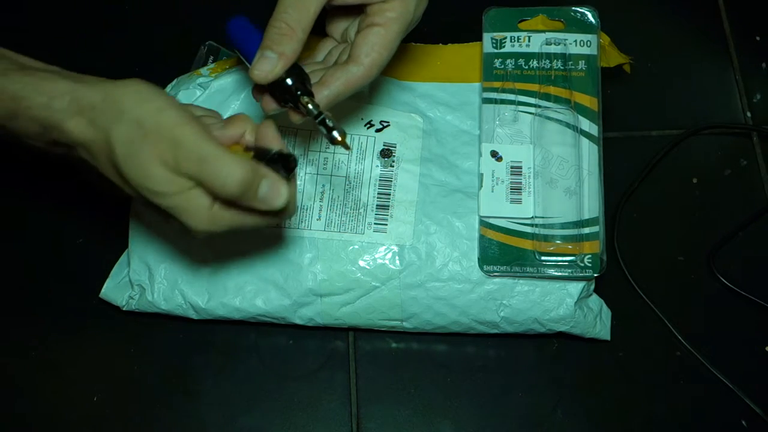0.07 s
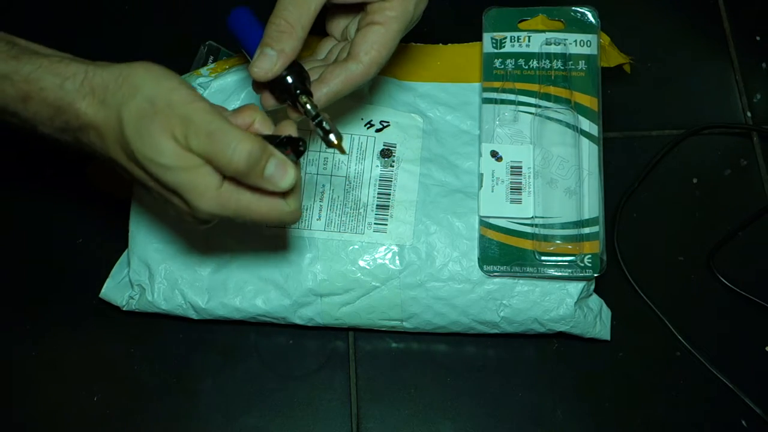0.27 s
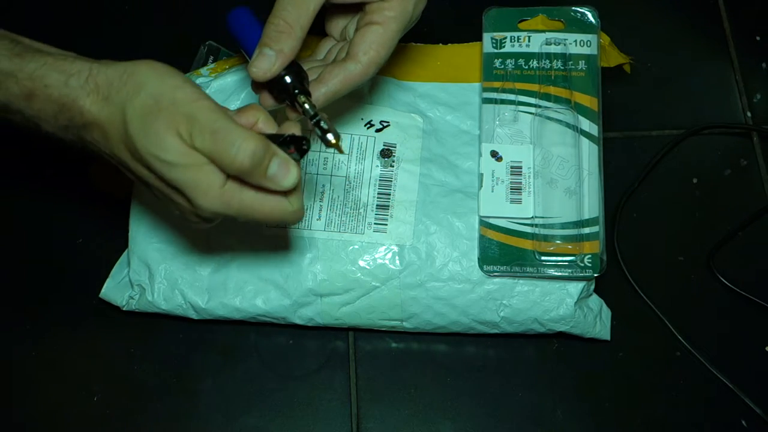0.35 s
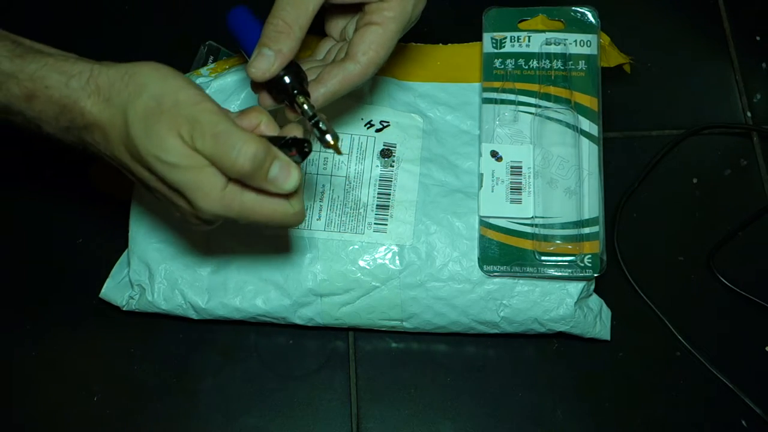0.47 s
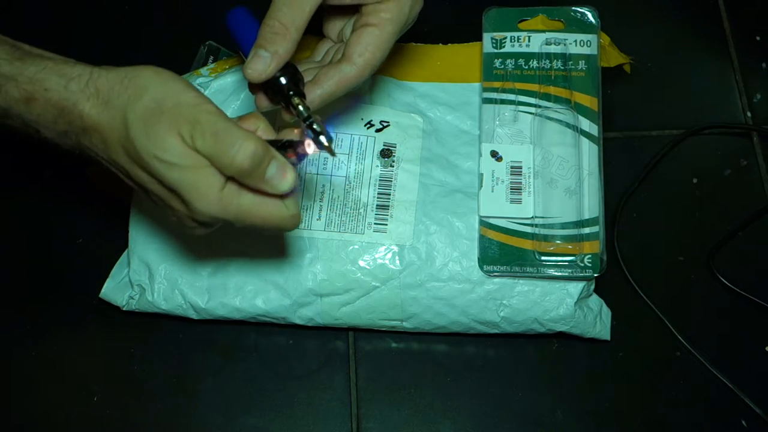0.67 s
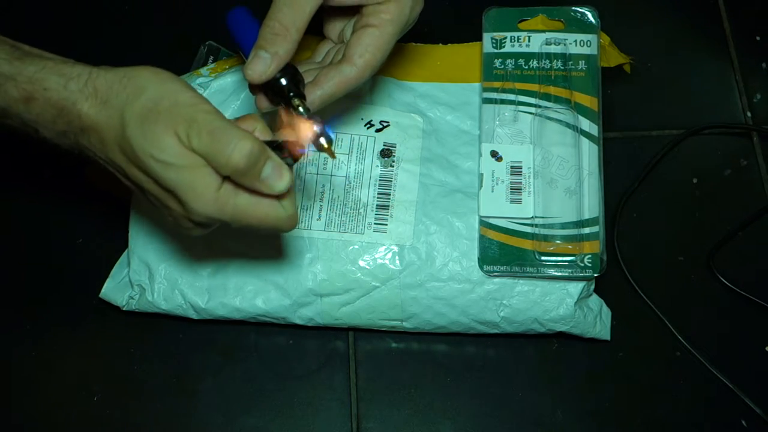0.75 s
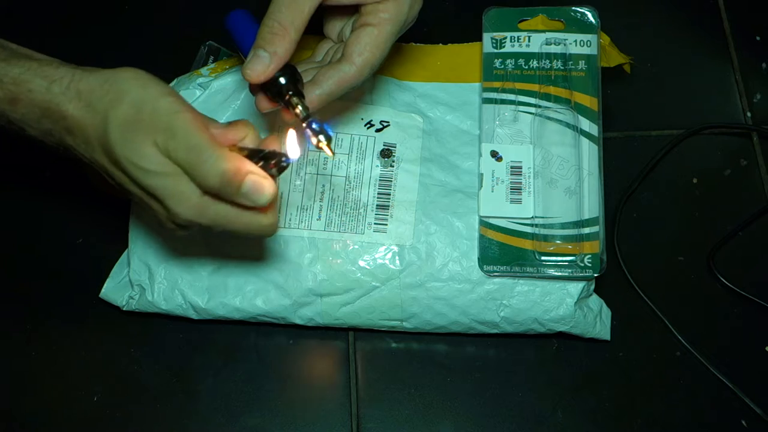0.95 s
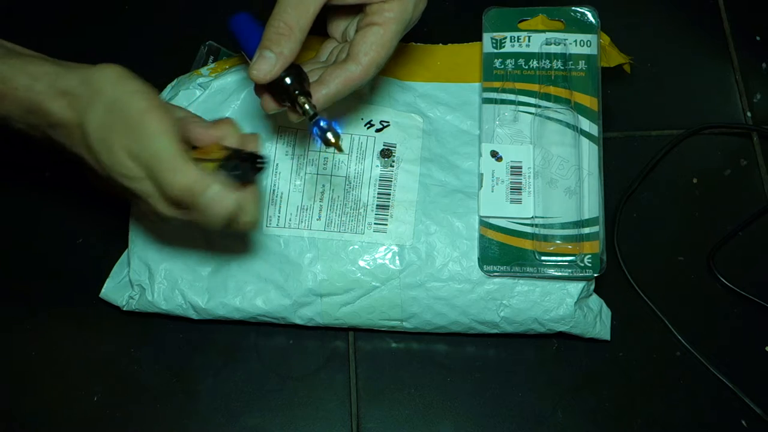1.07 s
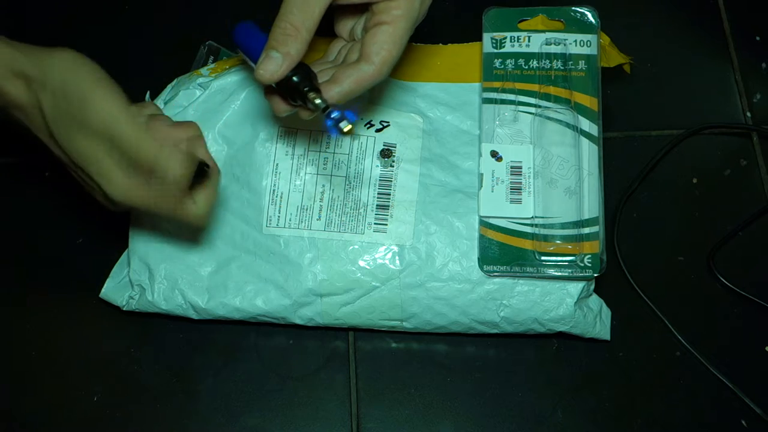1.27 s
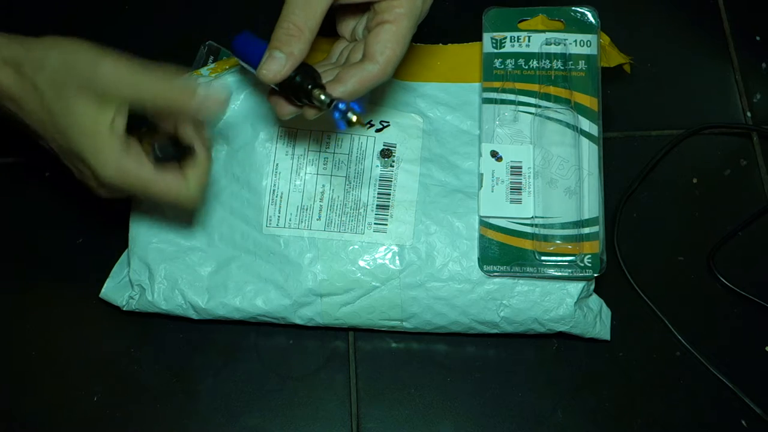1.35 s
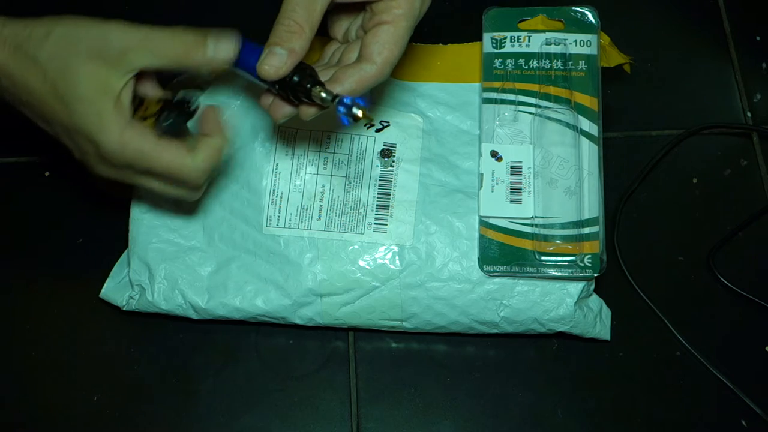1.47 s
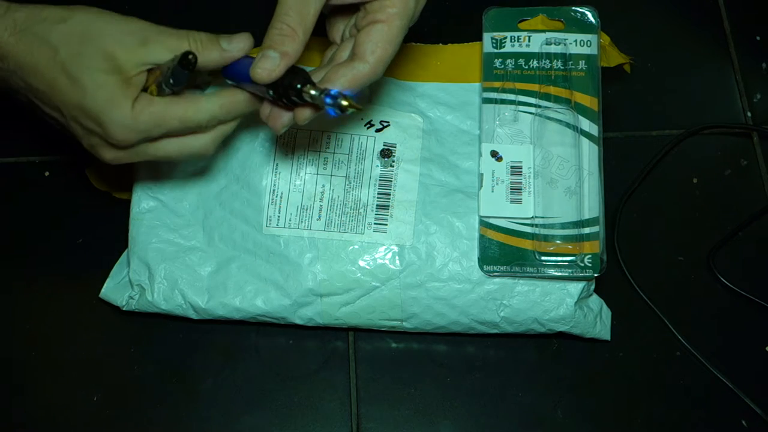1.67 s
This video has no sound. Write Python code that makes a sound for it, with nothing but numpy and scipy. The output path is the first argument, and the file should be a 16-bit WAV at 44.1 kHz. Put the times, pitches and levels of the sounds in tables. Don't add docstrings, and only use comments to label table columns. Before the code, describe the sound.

A flint lighter is worked close to the microphone in a small hard room, over faint steady gas hiss and low motor hum. Tiny steel ticks come at 0.12-0.23 s, a plastic knock at 0.37, ticks from 0.57, then a bright gritty flint rasp at 0.7 with a soft low puff. Lever clacks follow at 0.97 and 1.07, and a faint grip creak near 1.5.

```python
import sys
import numpy as np
from scipy import signal
from scipy.fft import rfft, irfft, next_fast_len
from scipy.io import wavfile
from scipy.ndimage import map_coordinates

SR = 44100
rng = np.random.default_rng(int(sys.argv[2]) if len(sys.argv) > 2 else 0)


def master(y):
    cut = np.clip(np.atleast_2d(y).T, -1, 1)
    pcm = np.round(cut * 32767)
    wavfile.write(sys.argv[1], SR, pcm.astype(np.int16))


def voltage_ratio(decibels):
    exponent = np.asarray(decibels, float) / 20
    return 10 ** exponent


N = 74970


def unit(x):
    return x / np.sqrt(np.mean(x ** 2) + 1e-20)


def along(points, hz):
    f, v = np.transpose(points)
    return np.interp(np.log(hz + 1), np.log(f + 1), v)


def curve(rows):
    return np.interp(np.arange(N) / SR, *np.transpose(rows))


def wobble(rate):
    knots = rng.standard_normal(int(N * rate / SR) + 4)
    return map_coordinates(knots, [np.arange(N) * rate / SR])


def filtered(x, response):
    m = next_fast_len(x.shape[-1] + 4096)
    spectrum = rfft(x, m) * response(np.fft.rfftfreq(m, 1 / SR))
    return irfft(spectrum, m)[..., :x.shape[-1]]


def peaks(table, f):
    total = 0
    for k, (centre, width, db) in enumerate(table):
        ring = 1j * f * width / (centre * centre - f * f + 1j * f * width)
        total = total + (-1) ** k * voltage_ratio(db) * ring
    return total


def sides(pair, gain, alike):
    turn = lambda hz: np.arccos(np.clip(along(alike, hz), -1, 1)) / 2
    mid, side = filtered(pair, lambda hz: gain(hz) * [np.cos(turn(hz)), np.sin(turn(hz))])
    return np.array([mid + side, mid - side])


def rush(gain, alike):
    return unit(sides(rng.standard_normal((2, N)), gain, alike))


# t/s, level/dB
FLOW = [(0.0, -55), (0.51, -56.5), (0.628, -56), (0.804, -58), (1.7, -63)]
# f/Hz, width/Hz, level/dB
JET = [(2350, 680, -3.5), (4212, 2000, -6), (5875, 1500, -4), (9597.3, 570, 9)]
# f/Hz, level/dB
JET_BED = [(1500, -22), (3000, -16.5), (7500, -18.5), (11000, -8.5)]
# f/Hz, likeness (1 = same)
JET_ALIKE = [(2000, 0.033), (10000, .15)]


def jet():
    hiss = rush(lambda f: np.abs(peaks(JET, f)) ** 1.1 + voltage_ratio(along(JET_BED, f)), JET_ALIKE)
    pan = voltage_ratio(np.array([[-.8], [.8]]))
    return hiss * voltage_ratio(curve(FLOW) + 6.0 + wobble(13.4)) * pan


# t/s, level/dB
SONG = [(0, -60), (.75, -58), (.9, -62), (1.3, -58), (1.45, -59), (1.7, -58)]
# f/Hz, width/Hz, level/dB
TUBE = [(5950, 380, 0), (4050, 350, -6), (2250, 350, -5)]


def tube_song():
    song = rush(lambda f: np.abs(peaks(TUBE, f)) ** 2, JET_ALIKE)
    return song * voltage_ratio(curve(SONG) + wobble(20))


SHAFT_HZ = 49.25
# multiple of shaft speed, level/dB rms, unsteadiness/dB
ORDER = [(2, -48.3, .9), (3, -67, 3), (5, -77, 1), (6, -77, 1), (9, -69.5, 1.2), (26, -64.5, .6),
         (29, -71, .8), (31, -76, .6)]
# f/Hz, level/dB per Hz
AIR = [(12, -66), (20, -38.5), (43, -20.5), (98, -10), (385, -19.5), (947, -27.5), (1280, -20),
       (1810, -29.5), (5000, -32), (6500, -69), (11000, -120)]
AIR_DB, WHIR_DB = -58.5, -68
# f/Hz, width/Hz, level/dB
WHIR = [(1374, 320, 0)]
# f/Hz, likeness
AIR_ALIKE = [(40, 1), (150, 0.85), (500, 0.35), (3000, 0.1)]


def motor():
    speed = SHAFT_HZ * (1 + 0.00135 * wobble(3.24))
    turn = 2 * np.pi * np.cumsum(speed) / SR
    out = voltage_ratio(AIR_DB) * rush(lambda f: voltage_ratio(along(AIR, f)) * (f < 5000), AIR_ALIKE)
    out = out + voltage_ratio(WHIR_DB) * rush(lambda f: np.abs(peaks(WHIR, f)) ** 2, AIR_ALIKE)
    for k, db, unsteady_db in ORDER:
        lead = 0.014 * k * np.array([[.5], [-.5]])
        level = np.sqrt(2) * voltage_ratio(db + unsteady_db * wobble(17.1))
        out = out + level * np.sin(k * turn + lead + rng.uniform(0, 2 * np.pi))
    return out


# f/Hz, t60/s
WALLS = [(1000, 0.27), (3000, 0.26), (6000, 0.24), (11000, 0.18)]
WALL_DB, WALL_DELAY_S = -2.5, .003


def walls(x):
    hz, t, z = signal.stft(rng.standard_normal((2, SR // 2)), SR, nperseg=256)
    fade = voltage_ratio(-60 * t / along(WALLS, hz)[:, None])
    tail = signal.istft(z * fade, SR, nperseg=256)[1]
    tail = tail / np.linalg.norm(tail[0])
    late = np.pad(x, (round(WALL_DELAY_S * SR), 0))[None]
    return voltage_ratio(WALL_DB) * signal.fftconvolve(late, tail, axes=1)[:, :len(x)]


def placed(x, pan_db):
    return (x + walls(x[1])) * voltage_ratio(np.array([[pan_db / 2], [-pan_db / 2]]))


# f/Hz, left-right likeness
NEAR_ALIKE = [(1500, -0.17), (2500, 0.51), (4000, 0.53), (6000, -0.11), (11000, -0.19)]
SNAP, HAND_PAN_DB = 3.03, -2


def strike(s, db, t60, response):
    t = np.arange(SR // 2) / SR
    rattle = voltage_ratio(-60 * t / t60) * (1 - np.exp(-t / 0.0011)) * rng.standard_normal((2, len(t)))
    rattle = rattle * voltage_ratio(2.55 * wobble(535)[:len(t)])
    snap = np.zeros(len(t))
    snap[0] = SNAP
    hit = filtered(snap, response) + sides(rattle, response, NEAR_ALIKE)
    out = np.zeros((2, N + SR))
    out[:, round(s * SR):][:, :len(t)] = placed(voltage_ratio(db + 2) * hit / np.abs(hit).max(), HAND_PAN_DB)
    return out[:, :N]


LOW_CUT_HZ = 1650


def small(f):
    return peaks([(LOW_CUT_HZ, LOW_CUT_HZ, 0)], f + 1) ** 2 * (1j * f / LOW_CUT_HZ) ** 2


def contacts(rows, body):
    low, middle, top = body
    out = 0
    for s, db, t60, low_db, top_db in rows:
        def response(f):
            ring = voltage_ratio(low_db) * peaks(low, f) + peaks(middle, f) + voltage_ratio(top_db) * peaks(top, f)
            return small(f) * ring
        out = out + strike(s, db, t60, response)
    return out


# t/s, peak level/dB, rattle t60/s, low ring/dB, top ring/dB
TICKS = [(.1187, -25.5, 0.013, -7, 1), (.1349, -26, 0.0093, -31, 11.5), (.1578, -29.5, 0.038, -8, 9),
         (.2279, -13, 0.0096, -17, 14.5), (.2313, -26.5, 0.004, -6, 9), (.5733, -17.5, 0.014, -8.5, 6.5),
         (.6539, -12.5, .014, -9.5, 2.5), (.6932, -19, 0.0097, -6, -15), (.695, -8.5, 0.0073, -6, -1)]
# f/Hz, width/Hz, level/dB
WHEEL = [
    [(2110, 560, 0)],
    [(3610, 760, -6.5), (4900, 520, -3.5), (6125, 560, 0.5), (8540, 2230, -1.5)],
    [(10530, 480, 1)],
]


def ticks():
    return contacts(TICKS, WHEEL)


# t/s, level/dB
JOLTS = [
    (.23, -68),
    (.715, -50),
    (1.07, -56),
]
JOLT_S = 0.0084


def jolts():
    t = np.arange(N) / SR
    bump = lambda u: np.exp(-u * u) * u * np.array([[1], [.6]])
    return sum(voltage_ratio(db) * bump((t - s) / JOLT_S) for s, db in JOLTS)


# t/s, peak level/dB, rattle t60/s, low ring/dB, top ring/dB
KNOCKS = [(.365, -12.5, 0.036, 7, 6), (.9692, -23.5, 0.039, 8.5, 4), (.978, -28.5, .045, 7, 1),
          (1.0645, -36, 0.015, 4, -19), (1.0702, -15, 0.02, 5, 0.5), (1.0818, -15, 0.032, -2, -7)]
# f/Hz, width/Hz, level/dB
SHELL = [
    [(2104, 417, 1)],
    [(3020, 610, -5), (3905, 290, 6)],
    [(6590, 1020, -0.5), (7140, 2100, -11.5), (9040, 2610, 4)],
]


def knocks():
    return contacts(KNOCKS, SHELL)


# t/s, peak level/dB, f/Hz
CREAKS = [(.366, -47.5, 552), (0.366, -50, 1220), (.717, -53, 409), (1.475, -54, 2170), (1.4895, -47, 3000),
          (1.502, -62, 2200), (1.501, -52, 4900)]
CREAK_T60_S, CREAK_Q = .025, 6


def creaks():
    out = 0
    for s, db, hz in CREAKS:
        out = out + strike(s, db, CREAK_T60_S, lambda f: peaks([(hz, hz / CREAK_Q, 0)], f) ** 2)
    return out


# t/s, level/dB
RASP = [(.691, -27), (.696, -25.5), (.705, -22.5), (.725, -21), (.745, -27), (.76, -34), (.79, -37)]
# f/Hz, level/dB per Hz
RASP_COLOUR = [(530, -70), (900, -47), (1990, -3), (2930, -8), (3360, 0.5), (4150, -5.5), (5410, -2.5),
               (9870, 5), (11200, 2.5), (14600, -39), (22000, -120)]
# f/Hz, width/Hz, level/dB
RASP_RING = [(1960, 540, 5.5), (3564, 680, 0.5), (5230, 350, 10.5)]
GRIT_DB, RASP_PAN_DB = 2, -2.5


def rasp():
    t = np.arange(N) / SR
    grit = rng.standard_normal((2, N)) * voltage_ratio(GRIT_DB * wobble(600) + 0.27 * wobble(89.7))
    colour = lambda f: voltage_ratio(along(RASP_COLOUR, f)) * (1 + np.abs(peaks(RASP_RING, f)))
    touching = (t > RASP[0][0]) * (t < RASP[-1][0])
    scrape = unit(sides(grit, colour, NEAR_ALIKE)) * voltage_ratio(curve(RASP)) * touching
    return placed(scrape, RASP_PAN_DB)


PUFF_S, PUFF_DB, PUFF_HZ, PUFF_LEN_S = .7, -34, 119.2, 0.0457
FLUTTER_DB, FLUTTER_HZ, FLUTTER_T60_S = -41.5, 187, 0.33


def puff():
    u = np.maximum(np.arange(N) / SR - PUFF_S, 0)
    swell = np.sin(np.pi * np.minimum(u / PUFF_LEN_S, .999)) ** 1.65
    thump = swell * np.sin(2 * np.pi * PUFF_HZ * u - 1.2)
    flutter = unit(filtered(rng.standard_normal(N), lambda f: peaks([(FLUTTER_HZ, 240, 0)], f) ** 2))
    fade = voltage_ratio(FLUTTER_DB - 60 * u / FLUTTER_T60_S) * (1 - np.exp(-(u / 0.02) ** 2))
    return voltage_ratio(PUFF_DB) * thump + fade * flutter


def scene():
    lighter = ticks() + jolts() + knocks() + creaks() + rasp() + puff()
    return jet() + tube_song() + motor() + lighter


def roll_off(x):
    return signal.sosfilt(signal.butter(12, 12280, fs=SR, output="sos"), x)


TOP_HZ = 11050


def record(dry):
    limit = lambda f: 1 / np.sqrt(1 + np.minimum(f / TOP_HZ, 1.1) ** 400)
    mix = filtered(dry, limit)
    return roll_off(mix)


dry = scene()
out = record(dry)
master(out)
```